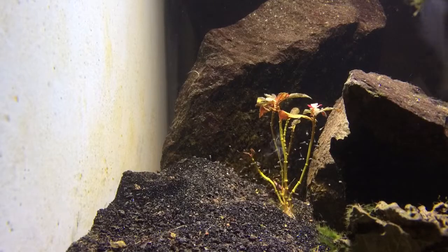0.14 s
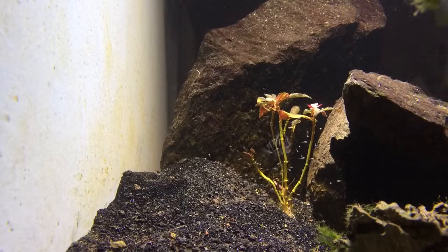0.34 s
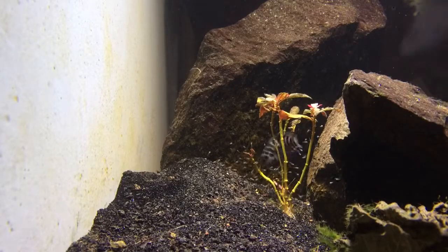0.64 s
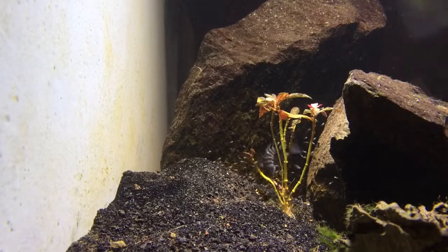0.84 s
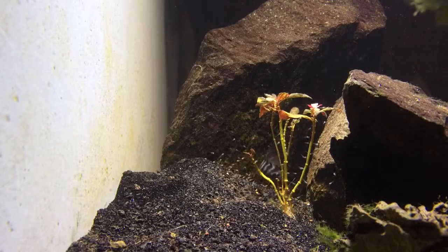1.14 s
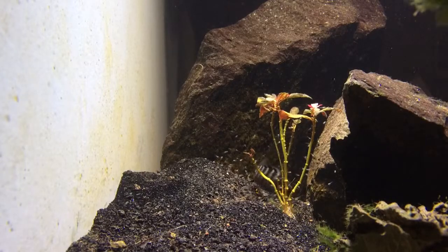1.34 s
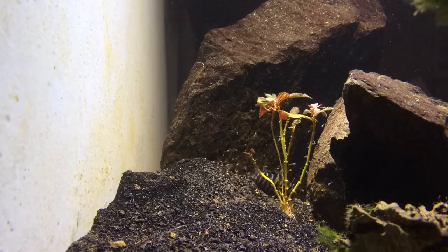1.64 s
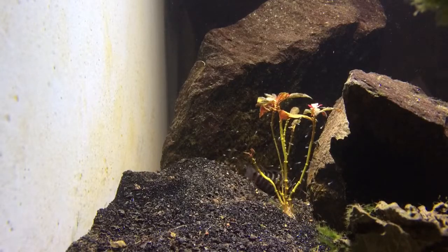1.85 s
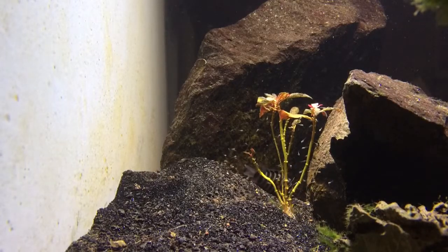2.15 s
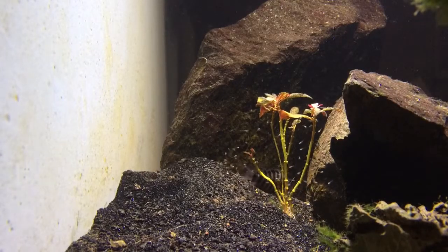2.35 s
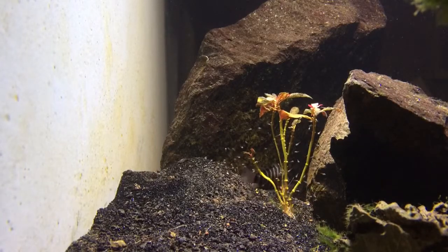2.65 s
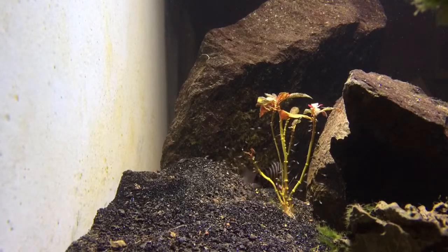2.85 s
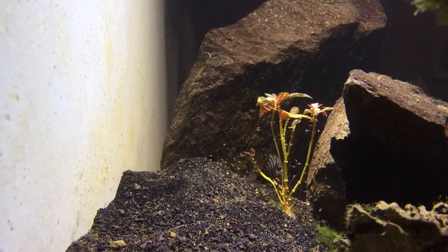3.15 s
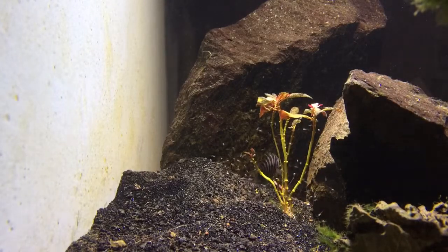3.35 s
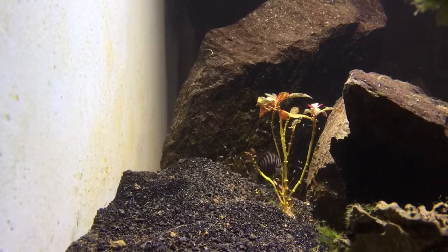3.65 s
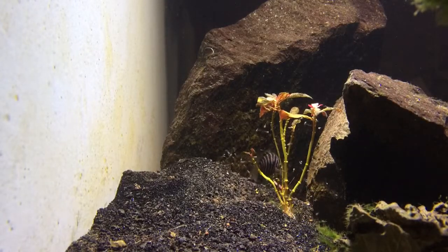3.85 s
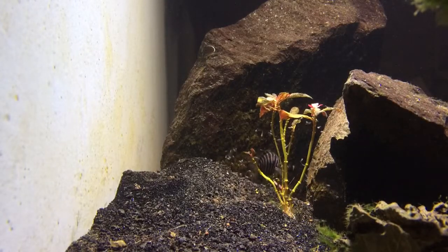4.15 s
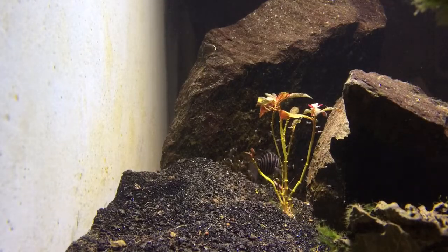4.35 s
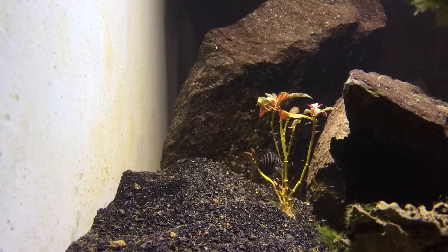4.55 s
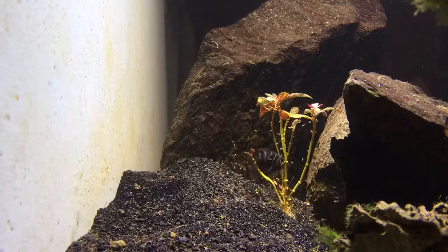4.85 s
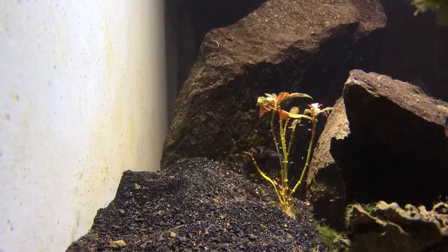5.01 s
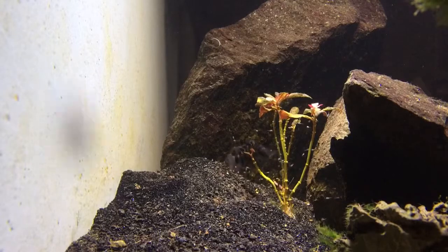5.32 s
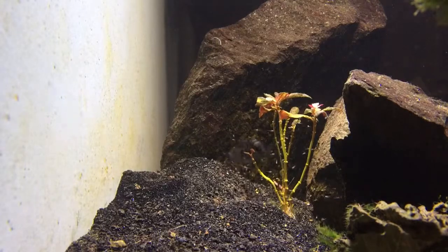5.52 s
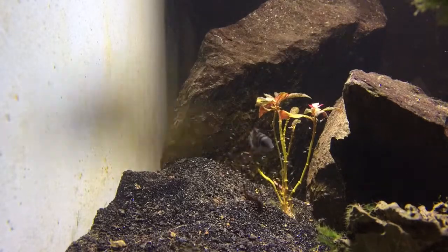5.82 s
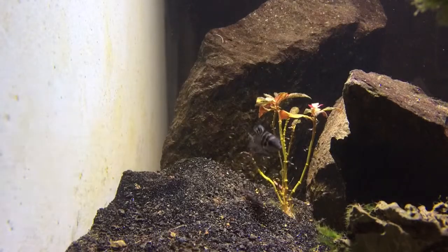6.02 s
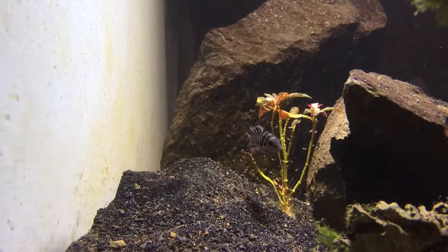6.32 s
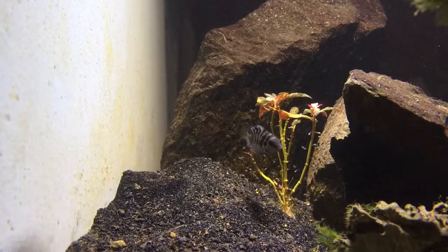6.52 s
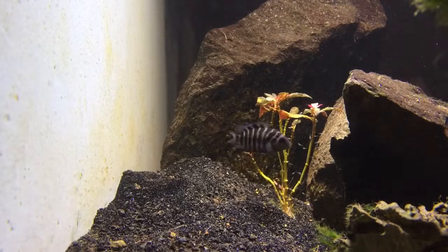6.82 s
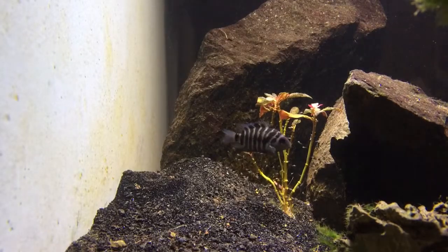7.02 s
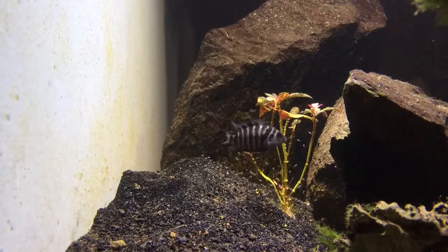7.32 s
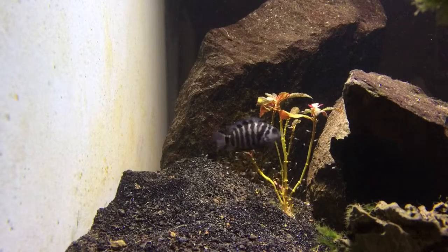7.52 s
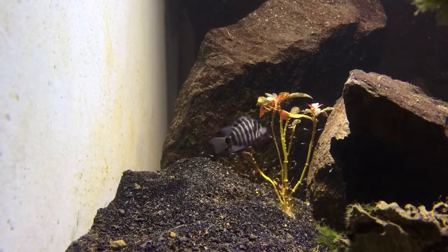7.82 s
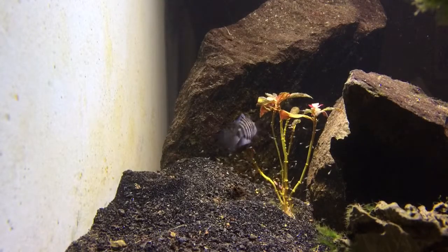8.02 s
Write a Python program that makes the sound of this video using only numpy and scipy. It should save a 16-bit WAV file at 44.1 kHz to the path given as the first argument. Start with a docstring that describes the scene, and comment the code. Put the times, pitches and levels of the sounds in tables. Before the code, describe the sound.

Continuous low electrical hum and muffled motor whirr fill the background while water dribbles crackling in front. The trickle is light and high, made of countless small bubbles and plinking drops ringing slightly in a plastic housing, with short watery echoes. It surges gently and thins out slowly towards the end; a single deeper gulp sounds just past the middle. Close microphone, mono, small indoor tank.

```python
"""Aquarium filter trickle

Water trickles back into a tank in soft surges about twice a second: random bubbles, splashes and a fine fizz.
Single pops are short decaying rings with noise bursts, and one low plop is a pair of decaying modes.
The filter housing rings along through resonances, and changing echoes bounce around the water.
Pumps in a quiet room are sine tones and shaped noise, with a slowly swelling drone."""
import sys
import numpy as np
from scipy import signal
from scipy.fft import rfft, irfft
from scipy.io import wavfile
from scipy.ndimage import uniform_filter1d

SR = 44100
rng = np.random.default_rng(int(sys.argv[2]) if len(sys.argv) > 2 else 0)


def int16_out(signal):
    """Quantize to a 16-bit WAV file."""
    q = np.round(np.clip(np.atleast_2d(signal).T, -1, 1) * 32767)
    wavfile.write(sys.argv[1], SR, q.astype(np.int16))


N = 360297  # length in samples
MAINS_HZ = 60.005  # the hum and the throb of the fizz share this


def trickle(bubbles_db=-1.0, splashes_db=-3.5, fizz_db=-67.0, follow=0.87, count=36):
    """Many small bubbles of every size, small wide splashes and a fine fizz, all swelling with the flow."""
    # colour of the small bubbles: pitch_hz [Hz], relative_db [dB]
    bubble_colour = [(1200, 11), (2000, -2), (3400, -4.5), (4800, -10), (6600, 4), (9000, -1.5),
                     (12000, -1), (15000, -3.5)]
    # colour of the small splashes: frequency_hz [Hz], relative_db [dB per Hz]
    splash_colour = [(1000, -30), (2000, -11), (4000, 10.5), (7000, 2.5), (11000, 5.5), (15400, -9)]
    # colour of the fizz under them: frequency_hz [Hz], relative_db [dB per Hz]
    fizz_colour = [(900, -17), (1600, -1), (2200, 5), (3400, 4), (4850, 0), (6700, 1), (10000, -3),
                   (13000, -3.5), (15400, 0)]
    throb = .28  # share by which the fizz throbs with the mains-driven pump
    flow_db = flow()

    strengths = scattered(600., 4.2, 1.4)
    kind = rng.integers(0, count, N)
    small = np.zeros(N)
    for k, hz in enumerate(np.geomspace(1400, 14500, count)):
        ring = bubble(hz, 0.002 + 13.0 / hz, rng.random((3, 3)))
        # pitches lie wider apart higher up, so each stands for more of the spectrum
        share = gain_of(read(bubble_colour, hz)) * np.sqrt(hz) / np.linalg.norm(ring)
        small += signal.oaconvolve(strengths * (kind == k), share * ring)[:N]

    drops = signal.oaconvolve(scattered(200.0, 3.7, 2.1), splash_shape(0.0093, rise=.0007))[:N]
    splashes = drops * noise(lambda hz: read(splash_colour, hz), patchy_db=-2.5, size=256)
    near = gain_of(bubbles_db) * evened(small) + gain_of(splashes_db) * evened(splashes)

    fizz = noise(lambda hz: read(fizz_colour, hz), patchy_db=3.0, size=256)
    fizz = fizz * (1 + throb * np.cos(2 * np.pi * MAINS_HZ * np.arange(N) / SR))
    fizz_level_db = fizz_db + follow * (flow_db - flow_db.mean())
    return gain_of(flow_db) * near, gain_of(fizz_level_db) * fizz


def flow():
    """Strength of the trickle in dB: a slow ebb with rounded surges on top."""
    # surges of the outflow: middle_s [s], above_steady_db [dB]
    surges = [(.3, 2), (.75, 1.5), (1.33, 3), (1.76, 2.5), (2.07, 1), (2.42, 1), (2.9, 3.5), (3.43, 2.5),
              (3.88, 4), (4.4, 3.5), (4.93, 3.5), (5.43, 4), (5.94, 5.5), (6.46, 4.5), (7.02, 2.5),
              (7.58, 2.5), (8.12, 3)]
    start_db, ebb_db_per_s = -68.5, -0.49
    surge_s = 0.068  # one standard deviation of the bell-shaped surge
    t = np.arange(0, N / SR + .02, .005)
    db = start_db + ebb_db_per_s * t
    for middle_s, up_db in surges:
        db = db + up_db * np.exp(-((t - middle_s) / surge_s) ** 2 / 2)
    return np.interp(np.arange(N) / SR, t, db)


def pops(lead=.001, wide_octaves=2.3, rag_octaves=0.32, rag_db=-6.0, ring_db=-1.5):
    """The loudest bubbles: a ring, a ragged burst close around its pitch, and the wide splash that set it free."""
    # the loudest bubbles: time_s [s], level_db [dB before the trims above], pitch_hz [Hz],
    # splash_db [dB of the wide splash against level_db, before its envelope is halved]
    loud_bubbles = [(0.031, -46.5, 5400, -1), (0.0638, -55, 3100, -12), (0.0693, -54, 9500, -7.0),
                    (0.12, -45, 5520, -6), (0.173, -53.5, 10760, -6), (0.18, -51, 3360, -6),
                    (0.2162, -51, 3420, 1), (0.267, -47, 3740, -5), (0.2849, -52, 5430, -13),
                    (0.3028, -49.5, 8250, -10), (0.318, -58, 2000, -13), (0.3288, -58, 3420, -6),
                    (0.3477, -54.5, 6580, -8.0), (0.3675, -59, 2140, -8.0), (0.391, -52, 5400, -12),
                    (0.3967, -53, 5460, -7), (0.412, -50.5, 3320, -8), (0.415, -55, 8200, 2),
                    (0.417, -56, 2110, -9.0), (0.444, -54, 2640, -12), (0.4746, -44.5, 2190, -15),
                    (0.4999, -56, 8600, -11.0), (0.518, -56, 2300, -1), (0.5188, -51.5, 5670, -20),
                    (0.547, -51, 3150, -11.0), (0.568, -51, 11100, -12.0), (0.657, -49, 3600, -3),
                    (0.679, -49, 3340, 0), (0.6994, -53, 5800, -11.0), (0.7396, -46.5, 2620, -5),
                    (0.8285, -49, 7000, -9.0), (0.9269, -56, 8240, -10.0), (0.994, -49.5, 2160, -19),
                    (1.0046, -57, 6900, -9.0), (1.083, -51.5, 10930, -9), (1.099, -52, 10000, -6),
                    (1.1015, -54, 2450, -7), (1.102, -60, 5350, -7), (1.123, -57, 9000, -10.0),
                    (1.1389, -52, 5730, -11), (1.1419, -52, 8830, -10), (1.168, -54, 1570, -11.0),
                    (1.1838, -54, 11300, -8.0), (1.2154, -51, 5660, -5), (1.2547, -54, 5400, 2),
                    (1.2616, -54, 8600, -12), (1.2637, -48, 3260, -6), (1.2936, -55, 7110, -8.0),
                    (1.3147, -50, 6600, 3), (1.326, -51.7, 6990, -9), (1.4392, -53.5, 5700, 2),
                    (1.4597, -55, 9000, 3), (1.4703, -53, 4260, -2), (1.4837, -50, 2380, -11.0),
                    (1.4974, -41.5, 2250, -13), (1.519, -54.5, 3460, -2), (1.521, -53, 5360, -10),
                    (1.569, -48.5, 9500, -1), (1.5754, -54, 6040, -10.0), (1.6283, -52.5, 6500, -13),
                    (1.6534, -57, 2590, -13), (1.6981, -56, 1600, -9.0), (1.714, -55.0, 2400, -10.0),
                    (1.7141, -54, 5570, -12.0), (1.7252, -45, 2850, -11), (1.7356, -55, 10930, -9.0),
                    (1.745, -47, 5460, -15), (1.7694, -54, 4480, -10), (1.7826, -51, 3360, -10.0),
                    (1.8144, -55, 6050, -4.0), (1.8159, -57, 3300, -7.0), (1.8638, -54, 5480, -16.0),
                    (1.8837, -55, 8900, -11.0), (1.9617, -60, 3340, -12), (2.002, -56, 1970, -15.0),
                    (2.0164, -48.5, 6640, -8), (2.038, -53, 8900, 1), (2.0389, -55, 5730, -8),
                    (2.0606, -48.5, 4920, -1), (2.0738, -52, 10270, -6.0), (2.0738, -48, 5700, -14.0),
                    (2.1057, -59, 3060, -7.0), (2.1197, -50, 4600, -14.0), (2.243, -54, 3600, -7.0),
                    (2.298, -56, 2000, -7), (2.3068, -54, 11970, -14.0), (2.327, -59, 7040, -12.0),
                    (2.346, -44.5, 2620, -5), (2.3606, -53, 2840, -3), (2.374, -47.5, 3280, -11.0),
                    (2.38, -49, 5900, -10.0), (2.402, -50.5, 8750, -12.0), (2.409, -56, 4240, -8.0),
                    (2.4255, -55, 6620, 1), (2.448, -48, 1890, -19), (2.455, -48, 2600, -12),
                    (2.4638, -43, 9250, -8), (2.4634, -51, 12300, -6), (2.524, -58, 6850, -2),
                    (2.585, -52, 4130, -16), (2.6091, -57, 4820, -12.0), (2.625, -46.5, 9670, -2),
                    (2.6644, -51, 3170, -7), (2.6994, -56, 3570, -6), (2.7498, -56, 8560, -11.0),
                    (2.7657, -55.5, 3330, -7.0), (2.7956, -56, 8650, -12.0), (2.823, -41, 2780, -6),
                    (2.832, -49, 6900, 1.5), (2.844, -54.9, 2160, -12.0), (2.8765, -46, 1970, -9),
                    (2.9124, -53, 12060, -10.0), (2.9219, -49, 5700, -11.0), (2.9288, -52, 3350, -10.0),
                    (2.93, -49.5, 8860, -9.0), (2.9722, -50, 14190, -2), (3.0705, -47.5, 1960, -23),
                    (3.121, -58, 3330, -12), (3.177, -55, 3330, -12.0), (3.191, -55, 9020, 5),
                    (3.3464, -55, 2120, -12.0), (3.3524, -55, 5500, -11.0), (3.3634, -54.1, 10660, -9.0),
                    (3.373, -52, 2220, 1), (3.4077, -51.5, 4340, 3), (3.4265, -52, 4020, -2),
                    (3.4586, -51.5, 8240, -1), (3.491, -49.5, 3480, -15), (3.5005, -56, 10900, -10.0),
                    (3.5993, -57, 4200, -8), (3.747, -53, 8810, -7), (3.7673, -49, 12200, -14.0),
                    (3.7994, -54, 8600, -12.0), (3.808, -54, 8800, -7.0), (3.854, -48, 2310, -16.0),
                    (3.8642, -57, 10090, -5.0), (3.8875, -47, 6160, -13), (3.8996, -52, 8400, -9),
                    (3.9181, -56, 11100, -9.0), (3.9286, -54, 8880, -10.0), (3.941, -53.5, 3320, -13.0),
                    (4.2034, -58, 6700, -9.0), (4.2339, -57, 4200, -6), (4.281, -56, 8950, -9.0),
                    (4.296, -47, 5600, -15.0), (4.3042, -54.5, 3720, 4), (4.3257, -53.5, 8630, -1),
                    (4.3786, -49.5, 3140, -13), (4.399, -55, 12100, -9), (4.405, -57, 4800, -10),
                    (4.427, -48.5, 9200, -15), (4.5172, -57, 6620, -3), (4.552, -59, 5870, -9.0),
                    (4.601, -57, 3850, -13), (4.668, -61, 2550, -12.0), (4.7016, -54, 3270, -11.0),
                    (4.7856, -52, 8860, -5), (4.8525, -57, 8680, -9.0), (4.8819, -55, 2300, -11),
                    (4.8887, -50, 5800, -9.0), (4.9164, -43.5, 2150, -5), (4.9173, -42.5, 6000, -5),
                    (4.9378, -56.2, 6030, -12.0), (4.9617, -50.1, 5800, 0), (5.058, -55, 6200, -10),
                    (5.293, -52, 8950, -15), (5.4012, -53, 14220, -5), (5.4212, -54, 12000, -8.0),
                    (5.424, -48.5, 2100, -13.0), (5.4706, -57, 6650, -6.0), (5.4721, -57, 4080, -10),
                    (5.5299, -58, 8550, -11), (5.875, -59, 3370, -7.0), (5.8751, -49, 6400, -10.0),
                    (5.8886, -48, 4760, -11.0), (5.899, -55, 6100, -6), (5.925, -57, 4370, -9.0),
                    (5.9408, -53, 6300, -4), (5.9412, -53, 4480, -6), (5.95, -48.1, 6640, -2),
                    (5.9709, -55, 6620, 3), (5.9713, -56, 3800, -6), (5.981, -54, 4040, -5.0),
                    (5.9829, -56, 2180, -14.0), (5.9859, -59, 6600, 0), (6.3536, -51, 7100, -4),
                    (6.407, -53.5, 3400, 1), (6.4349, -56, 10990, -12.0), (6.448, -50.4, 3150, -10),
                    (6.4483, -50, 12350, -8), (6.458, -59, 6600, -14), (6.478, -55.7, 4270, -1),
                    (6.4927, -57, 8530, -6.0), (6.538, -58, 3560, -10), (6.5463, -54, 5500, -1),
                    (6.6364, -57, 10970, -7.0), (6.6386, -56.5, 2700, -6), (6.7027, -56, 6920, -10.0),
                    (6.9714, -46, 3530, -4), (6.9717, -56, 11970, -7), (6.99, -48, 1330, -14),
                    (7.01, -60, 8660, -8.0), (7.1014, -58, 4780, 2), (7.1597, -57, 3850, -5),
                    (7.1996, -57, 3300, -13.0), (7.23, -54, 5530, -15.0), (7.4191, -54.5, 3620, -16),
                    (7.488, -59.5, 2420, -12.0), (7.5384, -56, 4170, -11.0), (7.6546, -58, 4170, -3),
                    (7.6691, -58, 3560, -7), (7.7439, -57, 4130, -10.0), (8.0102, -54.5, 4260, 0),
                    (8.0492, -57, 5530, -20)]
    out = np.zeros(N)
    chances = rng.random((len(loud_bubbles), 3, 3))
    hisses = rng.standard_normal((len(loud_bubbles), 500))
    snap = splash_shape(0.027, rise=0.00037) / 2
    rag = splash_shape(0.024, rise=0.00074) / 2
    bins = np.fft.rfftfreq(500, 1 / SR) + 1

    def around(hiss, hz, octaves):
        """Noise gathered around a pitch by a bell-shaped filter."""
        return evened(irfft(rfft(hiss) * np.exp(-(np.log2(bins / hz) / octaves) ** 2)))

    for (s, db, hz, splash_db), chance, hiss in zip(loud_bubbles, chances, hisses):
        # a fixed time plus some cycles, so big low bubbles ring longer
        ring = bubble(hz, .006 + 14. / hz, chance)
        ragged = gain_of(db + rag_db) * around(hiss, hz, rag_octaves) * rag
        splash = gain_of(db + splash_db) * around(hiss, hz, wide_octaves) * snap
        add(out, s - lead, gain_of(db + ring_db) * ring)
        add(out, s - lead, ragged + splash)
    return out


def bubble(hz, t60, chance, spread=0.17, sides_db=-6.0, lag=.0025, rise=0.0004):
    """A cluster of three soft-starting, dying rings: one on the pitch, one above and one below."""
    lag_chance, pitch_chance, phase = chance[:, :, None]
    # the side rings start late by chance, up to lag seconds
    t = np.maximum(np.arange(1200) / SR - lag * lag_chance * [[0], [1], [1]], 0)
    pitch = hz * (1 + spread * pitch_chance * [[0], [1], [-1]])
    envelope = (1 - np.exp(-t / rise)) ** 2 * gain_of(-60 * t / t60)
    rings = envelope * np.sin(2 * np.pi * (pitch * t + phase))
    cluster = rings[0] + gain_of(sides_db) * (rings[1] + rings[2])
    return cluster / abs(rings[0]).max()


def splash_shape(t60, rise=0.0039):
    """Soft-edged envelope of a drop hitting water: a quick rise, then a steady fall in dB."""
    t = np.arange(500) / SR
    shape = (1 - np.exp(-t / rise)) ** 2 * gain_of(-60 * t / t60)
    return shape / shape.max()


def scattered(per_s, spread_db, most):
    """Random moments, most of them weak and a few strong."""
    strength = gain_of(spread_db * np.minimum(rng.exponential(1, N), most))
    return strength * (rng.random(N) < per_s / SR)


def gulp():
    """A large bubble breaks the surface: a low plop whose modes swing together once, then die apart."""
    # the hollow modes of the bubble: pitch_hz [Hz], peak_db [dB], t60_s [s to fall by 60 dB]
    hollow_modes = [(565, -40.2, .03), (930, -40, .023)]
    deepest_s, rise_s = 4.5129, .003  # the moment of the deepest swing, and the rise to it
    out = np.zeros(N)
    t = np.arange(3000) / SR
    rise = np.sin(np.pi / 2 * np.minimum(t / rise_s, 1)) ** 2
    after = np.maximum(t - rise_s, 0)
    for hz, db, t60 in hollow_modes:
        swing = -np.cos(2 * np.pi * hz * (t - rise_s))
        add(out, deepest_s - rise_s, rise * gain_of(db - 60 * after / t60) * swing)
    return out


def ringing(x):
    """The plastic box rings along: each mode is a dying cosine, faster to die when its resonance is wide."""
    # modes of the housing over the outflow: one column, pitch_hz [Hz]
    mode_pitches = [1945, 2145, 2700, 3350, 3650, 5400, 6570, 8810]
    # resonance of each mode: width_hz [Hz], level_db [dB at its pitch against the direct sound]
    mode_shapes = [(90, -10), (109, -7.5), (320, -23), (140, 1), (220, -7), (160, -11), (338, -13),
                   (230, -23)]
    t = np.arange(2000) / SR
    modes = np.zeros(len(t))
    for hz, (width, db) in zip(mode_pitches, mode_shapes):
        modes += gain_of(db) * width * np.exp(-np.pi * width * t) * np.cos(2 * np.pi * hz * t)
    return x + signal.oaconvolve(x, modes * 2 * np.pi / SR)[:N]


def scatter(x, tail_db=-8.5, t60=0.07, drift_s=.06, count=3):
    """The sound bounces between lid, glass and a surface that never lies still."""
    t = np.arange(4000) / SR
    taps = rng.standard_normal((count, len(t))) * gain_of(-60 * t / t60) * (t > .001)
    # the echo paths take turns as the surface moves
    path = (np.arange(N) / SR / drift_s).astype(int) % count
    tails = np.zeros(N)
    for k, tap in enumerate(taps):
        tails += signal.oaconvolve(x * (path == k), tap / np.linalg.norm(tap))[:N]
    return x + gain_of(tail_db) * tails


def pumps(whirr_db=-56.5):
    """Mains hum and steady machine tones as sines, with rumble and whirr as shaped noise."""
    # magnetic hum on the multiples of the mains, from the first up: one column, level_db [dB rms]
    hum_levels = [-73, -50, -65, -63, -75, -83, -82, -86, -88, -85]
    # shafts, impellers and fans in the room: pitch_hz [Hz], level_db [dB rms]
    machine_tones = [(21.75, -85), (39.25, -80), (46, -75), (58.5, -66), (76.1, -72), (83.25, -69),
                     (101.4, -73), (108.75, -74), (143, -73), (145.25, -71), (194, -74), (226.5, -68),
                     (264, -81), (314.75, -80), (330.6, -83), (409.6, -82), (526.6, -83), (557.1, -81),
                     (669, -83), (676.9, -82), (699.25, -82), (705.1, -85), (760.6, -79), (822.25, -83),
                     (877.75, -86), (907.9, -87), (994.75, -88), (1045.4, -87), (1050.3, -90),
                     (1053.25, -86), (1056.25, -80), (1061.2, -89), (1108.8, -90), (1111.75, -84),
                     (1114.8, -88), (1117.75, -87), (1119.7, -85), (1122.6, -89), (1170.4, -90),
                     (1173.25, -80), (1178.25, -88)]
    # a faint whistle of the electronics: pitch_hz [Hz], level_db [dB rms]
    whistle_tones = [(14950, -94), (15000, -92), (15050, -92)]
    # colour of rumble and whirr: frequency_hz [Hz], relative_db [dB per Hz]
    whirr_colour = [(15, -70), (25, -7), (50, -4.5), (70, 0), (160, -2.5), (260, -4.5), (310, -5.5),
                    (390, -12), (430, -11), (720, -14.5), (1000, -20.5), (1400, -17.5), (1650, -25.5),
                    (3000, -32)]
    # humps of the cabinet in the whirr: middle_hz [Hz], width_hz [Hz], above_db [dB]
    cabinet_humps = [(119.4, 9.2, 5.3), (138.5, 8.1, 5.9), (199, 11, 3.2), (289, 13, 5.8), (434, 13, 4.9),
                     (678, 44, 2.7), (932, 135, 6), (1048, 11, 7.9), (1132, 26, 8.2), (1108, 22, 2.7)]
    t = np.arange(N) / SR
    lines = [(MAINS_HZ * (k + 1), db) for k, db in enumerate(hum_levels)]
    lines += list(machine_tones) + list(whistle_tones)
    tones = np.zeros(N)
    for hz, db in lines:
        # the root of 2 turns an rms level into a peak
        tones += gain_of(db) * np.sqrt(2) * np.sin(2 * np.pi * (hz * t + rng.random()))

    def colour(hz):
        """The whirr's colour with the humps on top, in dB."""
        humps = sum(db / (1 + (2 * (hz - f) / w) ** 2) for f, w, db in cabinet_humps)
        return read(whirr_colour, hz) + humps

    return tones + gain_of(whirr_db) * noise(colour, patchy_db=2.0, size=8192)


def drone():
    """A fuzzy narrow band of cabinet hum that swells slowly, as two machines drift in and out of step."""
    centre_hz, width_hz, middle_db = 256.6, 8, -68.5
    swell_s, swell_top_s, swell_db = 2, 1.63, 7.5  # period, a loudest moment, dB up and down
    band = noise(lambda hz: -20 * np.log10(1 + (2 * (hz - centre_hz) / width_hz) ** 2),
                 patchy_db=1.5, size=16384)
    swell = np.cos(2 * np.pi * (np.arange(N) / SR - swell_top_s) / swell_s)
    return gain_of(middle_db + swell_db * swell) * band


def noise(colour_db, patchy_db, size):
    """Noise built from random short-time spectra of a given colour with drifting patches."""
    frames, hz = 4 * N // size + 5, np.fft.rfftfreq(size, 1 / SR)
    a, b, patches = rng.standard_normal((frames, len(hz), 3)).T
    # smooth the patches over neighbouring frequencies, then over time
    patches = uniform_filter1d(patches, size=5, axis=0)
    patches = evened(uniform_filter1d(patches, size=9, axis=1))
    spectra = (a + 1j * b) * gain_of(colour_db(hz)[:, None] + patchy_db * patches)
    sound = signal.istft(spectra, nperseg=size, noverlap=3 * size // 4)[1]
    return evened(sound[:N])


def gain_of(db):
    """Decibels to a factor."""
    return 10 ** (np.asarray(db) / 20)


def evened(x):
    """Scales to rms 1."""
    return x / np.sqrt(np.mean(x ** 2) + 1e-20)


def read(points, hz):
    """Reads a spectrum between its points on a log-frequency axis."""
    f, value = np.transpose(points)
    return np.interp(np.log(hz + 1), np.log(f + 1), value)


def add(mix, s, sound):
    """Mixes a sound in at s seconds."""
    part = mix[round(s * SR):][:len(sound)]
    part += sound[:len(part)]


def scene():
    """Water in its housing, pumps around it."""
    small, fizz = trickle()
    water = ringing(scatter(pops() + small) + fizz)
    return (water + gulp() + pumps() + drone())[None]


def record(dry):
    """The band limit: a steep low-pass filter takes away the highest treble."""
    edge_hz = 15290
    low_pass = signal.firwin(1023, edge_hz, window=("kaiser", 9), fs=SR)
    return signal.oaconvolve(dry, low_pass[None], "same")


dry = scene()
out = record(dry)
int16_out(out)
```